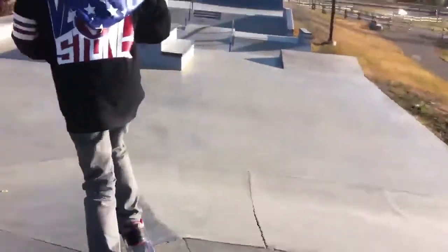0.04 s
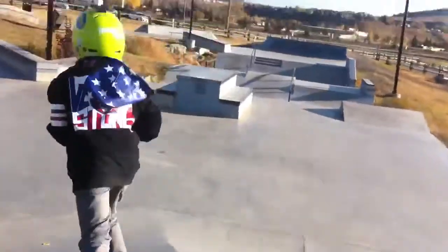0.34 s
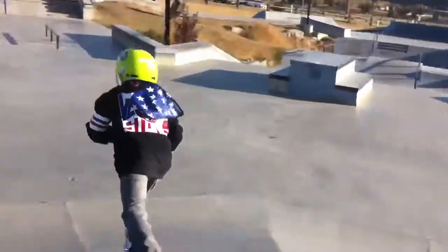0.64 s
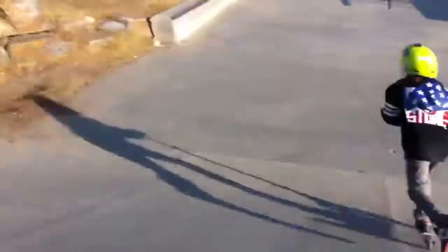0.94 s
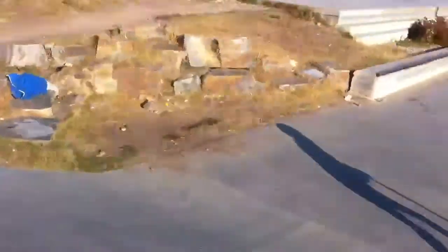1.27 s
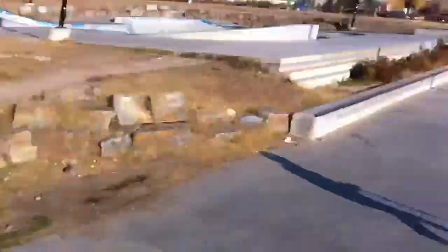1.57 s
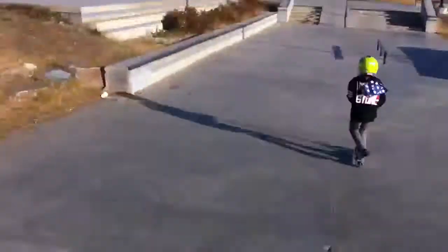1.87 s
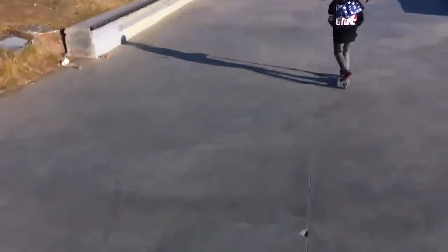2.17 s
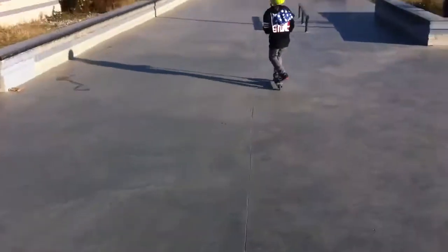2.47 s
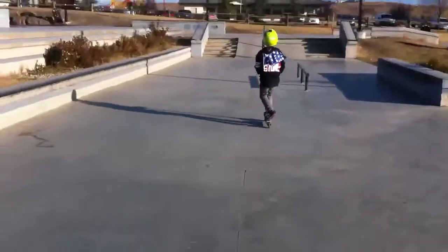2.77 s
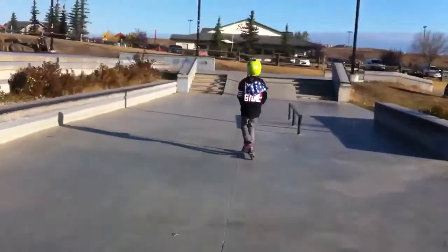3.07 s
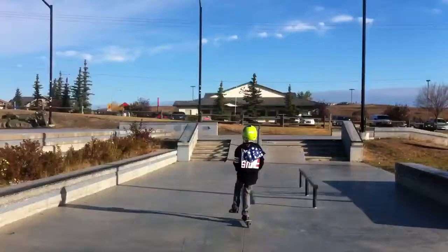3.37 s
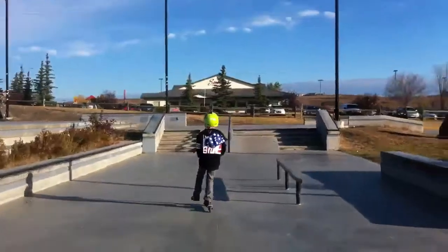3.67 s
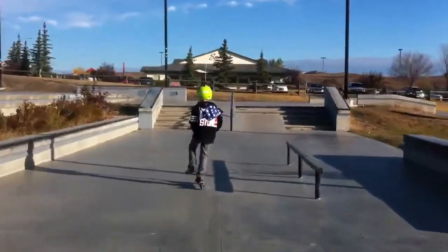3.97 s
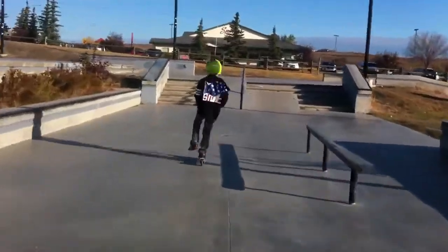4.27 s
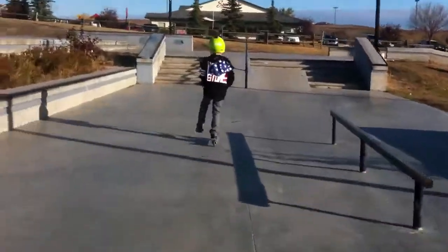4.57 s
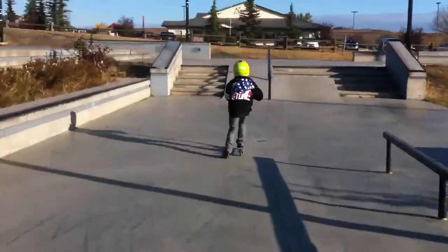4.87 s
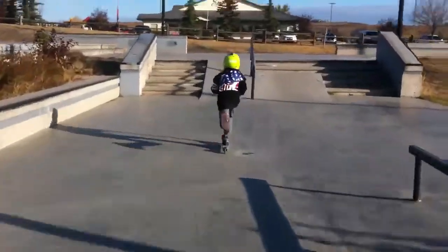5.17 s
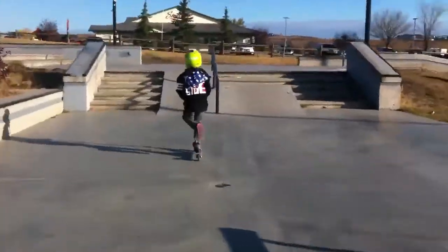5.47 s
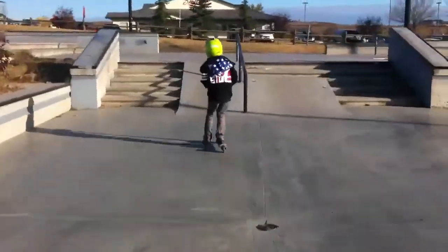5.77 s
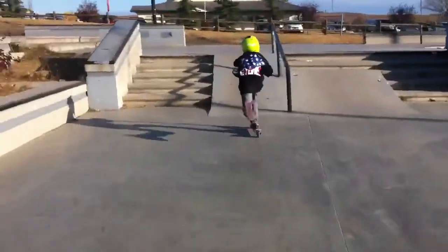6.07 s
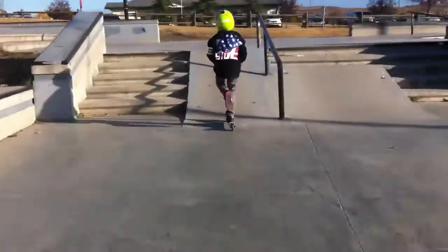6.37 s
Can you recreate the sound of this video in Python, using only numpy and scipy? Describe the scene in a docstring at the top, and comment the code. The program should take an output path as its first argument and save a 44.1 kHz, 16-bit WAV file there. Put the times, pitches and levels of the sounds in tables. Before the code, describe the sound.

Skateboard wheels roll close over concrete, slowly with a few sharp clacks, then fast with a steady gritty rumble and knocks at joints.

```python
"""A concrete skatepark, with small hard wheels rolling right under the microphone. They go slowly at first,
with a few sharp clacks of the deck, then fast down a ramp and on across joints and rough patches. The grain
of the concrete makes them rumble, grind and, at speed, hiss; worn, slightly oval treads add hum and
flutter. Grit snaps, the deck chatters and a shoe scrapes in one push. Bright clicks and soft rustles sit
close to the microphone, the park's faint wash lies behind, and a limiter holds down the hardest blows."""
import sys
import numpy as np
from scipy import signal
from scipy.fft import rfft, irfft, next_fast_len
from scipy.io import wavfile
from scipy.ndimage import uniform_filter1d, minimum_filter1d, map_coordinates

SR = 44100
rng = np.random.default_rng(int(sys.argv[2]) if len(sys.argv) > 2 else 0)


def wrap_up_sound(samples):
    """Save the sound to the file named by the first command line argument, as 16-bit audio."""
    columns = np.atleast_2d(samples).T
    # keep every value between -1 and 1, then stretch to whole-number steps
    tamed = np.clip(columns, -1, 1)
    steps = np.round(tamed * 32767).astype(np.int16)
    wavfile.write(sys.argv[1], SR, steps)


N = 283739

# The modes of the deck and its axles. Each row: frequency in Hz, level in dB, seconds to fade by 60 dB.
DECK_MODES = [(231, -10.5, 0.053), (323, -10, 0.032), (544.5, 5.5, 0.038), (652, 6.5, 0.013),
              (736, 0.5, 0.045), (960, 7, 0.019), (1037, 7, 0.039), (1307, 7.5, 0.017), (1445, 1.5, 0.04),
              (1612, -2.5, 0.035), (1880, -13, 0.042), (2155, -17.5, 0.039)]


def amp(db):
    """Decibels to gain."""
    return 10 ** (np.asarray(db) / 20)


def unit(x):
    """x at rms 1."""
    return x / np.sqrt(np.mean(x ** 2) + 1e-20)


def curves(rows):
    """One value per sample for each column after the time."""
    s, *cols = np.transpose(rows)
    return [np.interp(np.arange(N) / SR, s, c) for c in cols]


def wobble(rate):
    """A smooth random curve, rate knots a second."""
    return map_coordinates(rng.standard_normal(int(N * rate / SR) + 4), [np.arange(N) * rate / SR])


def plateau(start, length, edge_s):
    """An envelope that reaches 1 at the start, holds for the length and falls again."""
    corners = [start - edge_s, start, start + length, start + length + edge_s]
    return np.interp(np.arange(N) / SR, corners, [0, 1, 1, 0])


def coloured(x, points):
    """x through a causal filter with the (Hz, dB) response, at rms 1."""
    size = 2 ** 13
    hz, db = np.transpose(points)
    gain = amp(np.interp(np.log(np.fft.rfftfreq(size, 1 / SR) + 1), np.log(hz), db))
    cepstrum = irfft(np.log(np.maximum(gain, 1e-5)))
    cepstrum[1:size // 2] *= 2  # folded for minimum phase
    cepstrum[size // 2 + 1:] = 0
    impulse = irfft(np.exp(rfft(cepstrum)))
    return unit(signal.fftconvolve(x, impulse)[:len(x)])


def add(track, s, sound):
    """Mix a sound into the track at s seconds."""
    part = track[round(s * SR):][:len(sound)]
    part += sound[:len(part)]


def blend(a, b, share):
    """Two sounds at rms 1, with a share of the power going to the second."""
    share = np.clip(share, 0, 1)
    return np.sqrt(1 - share) * unit(a) + np.sqrt(share) * unit(b)


def grit(rate, spread_db):
    """Tiny impacts of uneven size, rate a second."""
    size = amp(spread_db * np.minimum(rng.standard_normal(N), 2))
    return unit((rng.random(N) < rate / SR) * size * rng.choice([-1, 1], N))


def bass_cut(x):
    """The microphone rolls off the bass below about 130 Hz."""
    return signal.sosfilt(signal.butter(5, 128, "high", fs=SR, output="sos"), x)


def air():
    """The faint low wash of the open park, behind everything else."""
    # The colour of the wash. Each row: frequency in Hz, level in dB.
    spectrum = [(20, -42), (50, -68), (90, -9), (135, 0), (220, 2), (400, -29), (1000, -10), (3000, -31),
                (16000, -38.5)]
    return amp(-50.5 + 1.5 * wobble(5)) * coloured(rng.standard_normal(N), spectrum)


def rustles():
    """Short, soft brushes of treble, as of a sleeve near the microphone."""
    # The brushes. Each row: start in seconds, length in seconds, level in dB.
    brushes = [(0.367, 0.21, -44.5), (1.353, 0.031, -41.5), (1.704, 0.022, -54), (2.225, 0.028, -55)]
    # Their colour. Each row: frequency in Hz, level in dB.
    spectrum = [(2000, 8.5), (3900, -2.5), (5000, 0.5), (6100, -4), (7400, 0), (8500, -3), (16000, -10)]
    fibres = grit(rate=2600, spread_db=4)
    envelope = sum(amp(db) * plateau(s, length, edge_s=0.045) for s, length, db in brushes)
    return envelope * amp(2.5 * wobble(61.9)) * coloured(fibres, spectrum)


def clicks():
    """Dry, bright clicks close to the microphone, each a crisp top over a lower body."""
    # The clicks. Each row: start in seconds, level in dB, body gain in dB, seconds to fade by 60 dB.
    events = [(.068, -40, 0, .04), (.071, -31, -1, .035), (.22, -25, -1, .03), (.2255, -14.5, 1, .022),
              (.248, -35, 2, .09), (.354, -31, -5, .02), (.364, -31, -7, .022), (.55, -30, -20, .02)]
    # The colours of top and body. Each row: frequency in Hz, level in dB.
    top_spectrum = [(500, -40), (3000, -6), (5500, 0), (8000, -2), (11000, -5), (14500, 1), (16000, -1)]
    body_spectrum = [(200, -38), (1200, -25), (1800, -5), (2100, -10), (2450, -4), (2700, -7), (3020, 3),
                     (3600, -11), (4400, -10), (6300, -17), (16000, -40)]
    out, t = np.zeros(N), np.arange(SR // 8) / SR
    rise = 1 - np.exp(-t / .002)
    for s, db, body_db, t60 in events:
        top, body = rng.standard_normal((2, len(t)))
        noise = .5 * coloured(top, top_spectrum) + amp(body_db) * coloured(body, body_spectrum)
        burst = rise * amp(-60 * t / t60)
        add(out, s, amp(db) * burst / burst.max() * noise)
    return out


def ticks():
    """A grain snaps out from under a wheel with a short, dry tick."""
    # The snapping grains. Each row: start in seconds, level in dB.
    snaps = [(.563, -38), (.798, -41), (.928, -36), (1.133, -38), (1.19, -40), (1.51, -47), (1.905, -48),
             (2.02, -45)]
    # The colour of a tick. Each row: frequency in Hz, level in dB.
    spectrum = [(2500, -18), (4000, -4), (5600, 0), (7500, -9), (14000, -12)]
    t60 = .016
    out, t = np.zeros(N), np.arange(SR // 32) / SR
    for s, db in snaps:
        add(out, s, amp(db - 60 * t / t60) * coloured(rng.standard_normal(len(t)), spectrum))
    return out


def push():
    """The sole lands, sticks and slips over the grain of the concrete and trails off as it lifts."""
    # The shoe's one stroke: start in seconds, length in seconds, level in dB.
    stroke = (5.283, 0.095, -19.5)
    # The colour of the scrape. Each row: frequency in Hz, level in dB.
    spectrum = [(100, -26), (500, -6), (800, 8.5), (1400, -2.5), (1900, -0.5), (2300, -16), (3300, -13),
                (4300, -28), (5500, -20), (8000, -41), (15000, -28)]
    s, length, db = stroke
    landing_s, release_t60 = 0.053, 0.16
    t = np.arange(N) / SR - s
    envelope = np.clip(1 + t / landing_s, 0, 1) * amp(db - 60 * np.maximum(t - length, 0) / release_t60)
    slips = amp(3.5 * wobble(160))
    return envelope * coloured(slips * grit(rate=3300, spread_db=4), spectrum)


def chatter():
    """On coarse ground the grains keep the deck's modes ringing."""
    # The coarse stretches. Each row: start and length in seconds, first and last level in dB.
    stretches = [(1.226, 0.18, -35.5, -42.5), (5.827, .26, -24, -24.5), (6.26, 0.22, -35.5, -21)]
    t = np.arange(SR // 8) / SR
    ring = sum((-1) ** k * amp(db - 60 * t / t60) * np.sin(2 * np.pi * hz * t)
               for k, (hz, db, t60) in enumerate(DECK_MODES))
    rattle = signal.fftconvolve(grit(rate=1600, spread_db=5), ring)[:N]
    envelope = np.zeros(N)
    for s, length, first_db, last_db in stretches:
        level_db, = curves([(s, first_db), (s + length, last_db)])
        envelope += plateau(s, length, edge_s=0.041) * amp(level_db)
    return envelope * unit(bass_cut(rattle))


def knocks():
    """Each blow rings the deck's modes anew and adds a crack; a harder contact favours the high modes."""
    # Blows at joints and landings. Each row: start in seconds, rough peak level in dB,
    # lift of the high modes in dB, crack against that peak in dB.
    blows = [(1.413, -4.5, 2, -17), (1.4277, -3, -3.5, -22), (1.692, -21.5, 8, -22),
             (1.8184, -1.5, -7.5, -21.5), (1.8564, -18.5, 0, -23), (2.193, -24.5, -12, -30),
             (2.263, -16, 3, -18), (2.274, -15.5, 9, -22), (2.779, -11.5, -6, -32), (3.186, -2.5, -22, -24),
             (3.279, -8, -4, -21.5), (3.453, -13.5, 5, -19), (3.64, -9, -12, -27), (4.064, -7, -8, -24),
             (4.396, -14, -1, -34), (4.571, -14, 5, -30), (4.718, -7, -7, -38), (5.281, -3.5, -6, -23),
             (5.296, -13.5, 9, -14), (5.309, -12, 5, -22), (5.335, -1, 5, -20), (5.372, 6, 4.5, -19),
             (5.396, -13, 1, -20), (5.426, -13.5, 9, -16), (5.462, -8, 17, -25), (5.561, -14.5, 2, -18),
             (5.874, -9.5, -8, -24), (6.094, 2, -8, -30), (6.186, -4, 0, -26)]
    # The crack of a hard wheel on an edge. Each row: frequency in Hz, level in dB.
    crack_spectrum = [(500, 18.5), (3000, 6.5), (4500, -1), (8000, -4), (16000, -4)]
    crest_db = 19.5  # the ring's peak over its mean level
    out, t = np.zeros(N), np.arange(SR // 8) / SR
    hz, mode_db, t60 = np.transpose(DECK_MODES)[:, :, None]
    treble = np.interp(np.log(hz), np.log([540, 1400]), [0, 1])
    sign = (-1) ** np.arange(len(DECK_MODES))[:, None]
    for s, db, bright_db, crack_db in blows:
        scatter_db, detune = rng.standard_normal((2, len(DECK_MODES), 1))
        decays = amp(mode_db + bright_db * treble + scatter_db - 60 * t / t60)
        modes = sign * decays * np.sin(2 * np.pi * hz * (1 + .01 * detune) * t)
        ring = amp(-crest_db) * unit(bass_cut(modes.sum(0)))
        noise = coloured(rng.standard_normal(len(t)), crack_spectrum)
        crack = amp(crack_db - 60 * t / 0.035) * bass_cut(noise)
        thump = amp(-48 - 60 * t / .09) * np.sin(2 * np.pi * 40 * t)  # the jolt reaches the microphone
        add(out, s, amp(db) * (ring + crack + thump))
    return out


def hiss(ground, fast):
    """An even rustle, as of clothes near the microphone, with a faint crackle while the wheels are slow;
    fast wheels fizz over the concrete."""
    # The hiss at a crawl and at full roll. Each row: frequency in Hz, level in dB.
    slow_spectrum = [(2000, 5.5), (4000, -4), (7500, -3.5), (11000, -4), (14000, -4), (16000, -19)]
    fast_spectrum = [(2470, -21), (4200, -10), (4540, 1.5), (5280, 3.5), (6320, 0), (7860, -11), (9190, -7),
                     (13200, -3), (15100, -11), (16000, -4)]
    crackle = grit(rate=160, spread_db=4)
    rustle = coloured(blend(rng.standard_normal(N), crackle, share=0.4), slow_spectrum)
    fizz = coloured(blend(ground, rng.standard_normal(N), share=0.63), fast_spectrum)
    return blend(rustle, fizz, share=fast)


def tread(turns, size=900):
    """The roughness of one wheel's rim, felt again on every turn."""
    return unit(np.interp(turns % 1, np.arange(size) / size, rng.standard_normal(size)))


def hubs(contact, turns):
    """The hubs rub once a turn and ring in narrow bands, shaken by the wheels' contact with the ground."""
    # The rings. Each row: start and length in seconds, centre and width in Hz, dB against the fast grind.
    rings = [(2.848, 1.3, 2940, 500, -29.5), (3.07, 1.1, 3410, 110, -28.5), (4.25, 1.5, 3090, 710, -28),
             (5.448, 0.68, 3140, 450, -25.5), (5.55, 0.41, 5270, 500, -37)]
    rub = unit(amp(4.5 * np.cos(2 * np.pi * turns)))
    out = np.zeros(N)
    for s, length, hz, width, db in rings:
        ring = signal.lfilter(*signal.iirpeak(hz, hz / width, SR), rub * contact)
        out += amp(db) * plateau(s, length, edge_s=0.095) * unit(ring)
    return out


def grind(ground, turns, speed, load, fast):
    """Hard wheels grind on the grain: with little rasp at a crawl, with flutter and hub rings at speed."""
    # The grind at a crawl and at full roll. Each row: frequency in Hz, level in dB.
    slow_spectrum = [(450, -28), (660, 5), (850, 6.5), (1030, 5.5), (1180, 4), (1450, 4), (1800, -3.5),
                     (2400, -14.5), (3200, -24), (4500, -93)]
    fast_spectrum = [(410, -42), (690, -1.5), (775, 4), (896, -2), (1010, 1.5), (1160, -4), (1400, -2.5),
                     (1620, -10), (1850, -15.5), (2360, -21.5), (3100, -26.5), (3700, -30), (4200, -40),
                     (7000, -100)]
    flutter_db = 1
    contact = blend(ground, tread(turns), share=0.13)
    crawl = coloured(grit(rate=120 * speed, spread_db=2.5), slow_spectrum)
    rasp = coloured(amp(flutter_db * load) * contact, fast_spectrum)
    return blend(crawl, rasp + hubs(contact, turns), share=fast)


def tread_wave(count, turns):
    """The tone of count waves round the rim, its phase wandering a little."""
    return np.sin(2 * np.pi * (count * turns + rng.random() + .07 * wobble(16)))


def hum(turns, speed):
    """Waves in the tread sound at multiples of the wheel speed, wavering and swelling as the rider leans."""
    # The wear of the tread. Each row: number of waves round the rim, level in dB.
    wear = [(6, -9), (7, 0), (8, -1), (9, 1), (10, 0), (11, 0), (12, -5), (16, -4), (17, -3), (18, -3),
            (19, -5), (20, -4), (21, -3)]
    ripple_count, peak_hz, width_hz = 15, 424, 85
    tones = sum(amp(db + 3.5 * wobble(7)) * tread_wave(count, turns) for count, db in wear)
    # the strongest wave is a ripple tone that swells where it meets a resonance of the deck
    resonance = 1 / np.hypot(1, 2 * (ripple_count * speed - peak_hz) / width_hz)
    ripple = resonance * amp(-5 + 2.5 * wobble(11)) * unit(tread_wave(ripple_count, turns))
    return unit(tones) + ripple


def rumble(ground, turns, speed, load, coarse_db):
    """Grain and worn treads shake the deck; the hum's share grows with speed and on smooth concrete."""
    # The colour of the shaking deck. Each row: frequency in Hz, level in dB.
    spectrum = [(70, -52.5), (102, -47.5), (139, -18), (192, 0.5), (346, 0), (428, -3), (555, 2.5),
                (700, -3.5), (910, -28.5), (1540, -120)]
    flutter_db = 1.7
    hum_share = np.interp(speed, [19, 27.9], [0, 1]) * (0.6 - 0.38 * coarse_db)
    shake = blend(coloured(ground, spectrum), hum(turns, speed), share=hum_share)
    return unit(amp(flutter_db * load)) * shake


def rolling():
    """Wheels right under the microphone meet more grains at speed; coarse patches grind and hiss more."""
    # The pace of the wheels. Each row: time in seconds, turns a second.
    pace = [(0, 12), (2.3, 14), (2.6, 22), (2.8, 27), (2.95, 31), (3.13, 30.5), (3.27, 28.2), (3.43, 27.4),
            (3.74, 29.4), (3.89, 28.3), (4.12, 29.2), (4.24, 26.2), (4.48, 25.2), (4.57, 26.7),
            (4.75, 26.4), (4.85, 25.2), (5.18, 26.1), (5.27, 27.2), (5.6, 26.1), (6.43, 26)]
    # The strength of the rolling on ordinary concrete. Each row: time in seconds, level in dB.
    strength = [(0, -46), (.65, -37.5), (.8, -42), (1.04, -31.5), (1.3, -36.5), (1.48, -46.5),
                (1.75, -44.5), (2.15, -49), (2.3, -37.5), (2.74, -24.5), (3.1, -16.5), (3.38, -22),
                (4.02, -21), (4.2, -23), (5.2, -19), (5.6, -20.5), (6.43, -22.5)]
    # Rougher or smoother concrete. Each row: start and length in seconds,
    # lift of all the rolling in dB, extra grind in dB.
    patches = [(0, 0.31, 2.5, 1), (0.355, 0.14, 6.5, 0), (0.887, 0.069, 6.5, 1.5), (1.182, 0.083, 7, -1.5),
               (1.636, 0.075, 6.5, 1.5), (2.31, 0.46, 0, -0.5), (2.852, 0.27, -1.5, 0), (3.9, 0.12, 1.5, 0),
               (4.16, 0.044, 0, 3.5), (4.53, 0.11, 0.5, 0), (4.787, 0.37, -1, -1.07),
               (5.387, 1.05, -3, 1.5), (5.713, 0.38, 1, 2)]
    slow_grind_db, fast_grind_db = -1, -4  # against the rumble
    slow_hiss_db, cruise_hiss_db = -19, -25.5  # against the grind
    cruise_grind_db, hiss_growth = -26, 0.41  # extra dB of hiss for each dB of grind over cruising level
    level_db, = curves(strength)
    speed, = curves(pace)
    turns = np.cumsum(speed) / SR
    fast = np.interp(speed, [13.5, 20], [0, 1])  # 0 at a crawl, 1 at full roll
    load = fast * np.cos(4 * np.pi * turns)  # a slightly oval wheel presses harder twice a turn
    lift_db, coarse_db = sum(np.outer([lift, coarse], plateau(s, length, edge_s=0.058))
                             for s, length, lift, coarse in patches)
    texture_db = .8 * wobble(45)  # smoother and rougher spots pass
    rumble_db = level_db + lift_db
    grind_db = rumble_db + coarse_db + texture_db + (1 - fast) * slow_grind_db + fast * fast_grind_db
    fast_hiss_db = cruise_hiss_db + hiss_growth * (grind_db - cruise_grind_db)
    hiss_db = grind_db + (1 - fast) * slow_hiss_db + fast * fast_hiss_db
    ground = unit(grit(rate=70 * speed, spread_db=3.5) / np.sqrt(speed))  # denser with speed, at even power
    return (bass_cut(amp(rumble_db + .5 * texture_db) * rumble(ground, turns, speed, load, coarse_db))
            + amp(grind_db) * grind(ground, turns, speed, load, fast)
            + amp(hiss_db) * hiss(ground, fast))


def scene():
    """The board and the park at one microphone."""
    return (rolling() + chatter() + push() + knocks() + clicks() + ticks() + rustles() + air())[None]


def limiter(x, ceiling, release_db):
    """The gain ducks just ahead of any peak over the ceiling and comes back at release_db a second."""
    window = 64  # samples
    needed_db = 20 * np.log10(np.minimum(1, ceiling / (np.abs(x) + 1e-9)))
    held_db = minimum_filter1d(needed_db, window)
    recovery_db = release_db * np.arange(N) / SR
    gain_db = np.minimum.accumulate(held_db - recovery_db, axis=-1) + recovery_db
    return x * amp(uniform_filter1d(gain_db, window))


def record(dry):
    """The camera limits the peaks and keeps nothing above its band limit."""
    size = next_fast_len(N + SR // 2)
    held = limiter(dry, ceiling=.7, release_db=500)
    in_band = np.fft.rfftfreq(size, 1 / SR) < 15950
    return irfft(rfft(held, size) * in_band, size)[:, :N]


dry = scene()
out = record(dry)
wrap_up_sound(out)
```